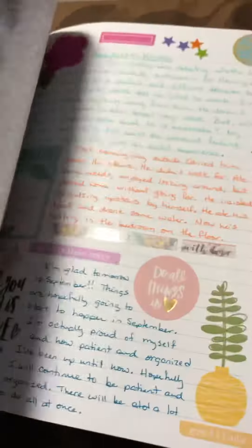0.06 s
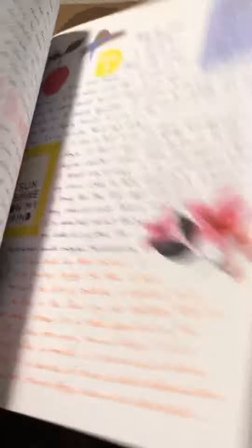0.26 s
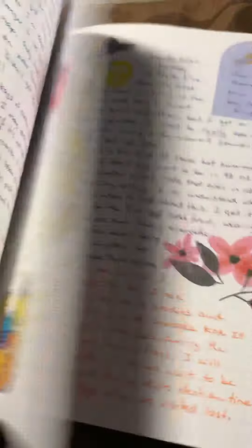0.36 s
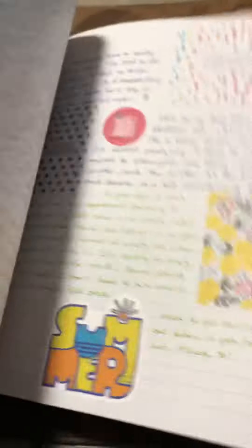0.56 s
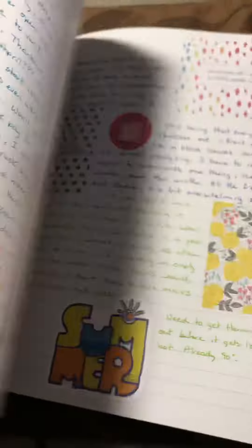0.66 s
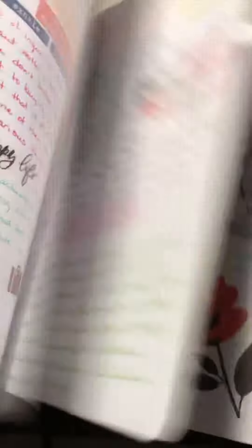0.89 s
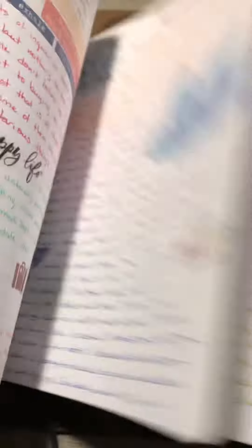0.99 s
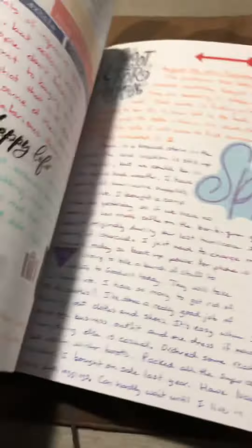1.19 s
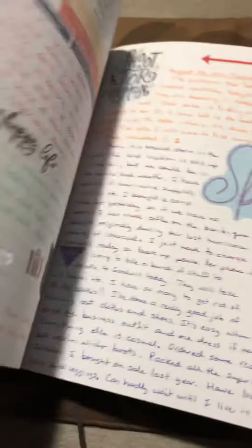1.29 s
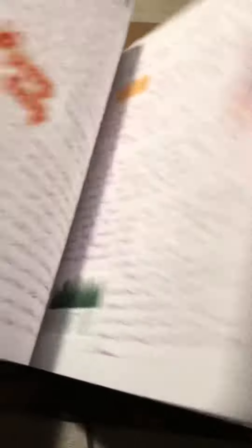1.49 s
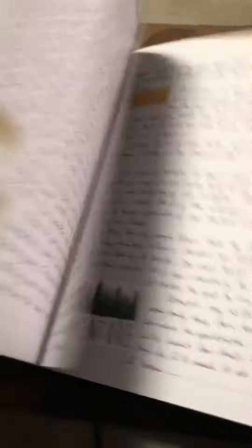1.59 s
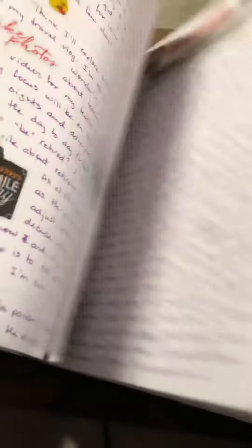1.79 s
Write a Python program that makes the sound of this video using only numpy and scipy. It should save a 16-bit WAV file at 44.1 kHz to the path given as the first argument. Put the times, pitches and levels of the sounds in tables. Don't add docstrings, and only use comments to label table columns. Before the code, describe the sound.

Thick paper pages slip off a thumb with sharp dry flicks, faint rustles and soft air puffs

```python
import sys
import numpy as np
from scipy import signal
from scipy.fft import rfft, irfft, next_fast_len
from scipy.io import wavfile
from scipy.ndimage import uniform_filter1d, map_coordinates

SR = 44100
rng = np.random.default_rng(int(sys.argv[2]) if len(sys.argv) > 2 else 0)


def invert_db(level):
    return 10 ** (np.asarray(level, dtype=float) / 20)


def generate_wav(signal):
    frames = np.transpose(np.atleast_2d(signal))
    scaled = np.clip(frames, -1, 1) * 32767
    pcm = np.round(scaled).astype(np.int16)
    wavfile.write(sys.argv[1], SR, pcm)


N = 81585


def unit(x):
    return x / np.sqrt(np.mean(x ** 2) + 1e-20)


def along(points, hz):
    f, v = np.transpose(points)
    return np.interp(np.log(hz + 1), np.log(f + 1), v)


def filtered(x, response, size):
    return irfft(rfft(x, size) * response(np.fft.rfftfreq(size, 1 / SR) + 1e-3), size)


def wobble(rate, count):
    knots = rng.standard_normal(int(count / SR * 8000) + 4)
    return map_coordinates(knots, [np.arange(count) * rate / SR])


def add(out, s, piece):
    out[round(s * SR):][:len(piece)] += piece


def lateness(f, delay_ms):
    spread = 0.7
    return np.exp(-2j * np.pi * delay_ms * (f / 1000) ** (1 - spread) / (1 - spread))


# (frequency [Hz], density [dB per Hz])
AIR_SPECTRUM = [(26, -29), (48, 3.5), (236, 0), (480, -9.5), (1470, -18.5), (4350, -23.5), (15900, -30),
                (16500, -71)]
# (frequency [Hz], level [dB], width [Hz])
HUM_LINES = [
    (61, -70, 15),
    (503.8, -77.5, 9.9),
    (552, -81, 7.2),
]
AIR_DB, AIR_WOBBLE_DB, PATCHY_DB = -62.5, 0.4, 1.5


def air():
    z = signal.stft(rng.standard_normal(N + 512), nperseg=512)[2]
    field = uniform_filter1d(rng.standard_normal(z.shape), size=12, axis=0)
    field = uniform_filter1d(field, size=8, axis=1)
    patchy = signal.istft(z * invert_db(PATCHY_DB * unit(field)), nperseg=512)[1][:N]
    size = next_fast_len(N + 8192)
    noise = filtered(patchy, lambda f: invert_db(along(AIR_SPECTRUM, f)), size=size)[:N]
    hum = np.zeros(N)
    for hz, db, width in HUM_LINES:
        line = filtered(rng.standard_normal(N), lambda f: 1 / (1 + (2 * (f - hz) / width) ** 2), size=size)
        hum += invert_db(db) * unit(line[:N])
    return invert_db(AIR_DB + AIR_WOBBLE_DB * wobble(6.04, count=N)) * unit(noise) + hum


def strokes(table, q, rough_db, rate):
    out, t = np.zeros(N + SR), np.arange(4096) / SR
    fade = 0.26
    for s, length, db, hz in table:
        def resonance(f):
            damping = 1j * f * hz / q
            return (damping / (hz * hz - f * f + damping)) ** 2 / (1 + (f / hz / 2) ** 4)

        noise = rng.standard_normal(4096) * invert_db(rough_db * wobble(rate, count=4096))
        tone = filtered(noise, resonance, size=4096)
        rise = np.clip(t / (fade * length / 2), 0, 1)
        fall = np.exp(-np.maximum(t - (1 - fade) * length, 0) / (fade * length))
        shape = rise * fall
        add(out, s, invert_db(db) * tone * shape * np.linalg.norm(shape) / np.linalg.norm(tone * shape))
    return out[:N]


# (start [s], length [s], level [dB], pitch [Hz])
RUB_EVENTS = [(.12, 0.048, -75, 4930), (.22, 0.05, -69, 3800), (.313, 0.033, -58.5, 2550),
              (.315, 0.024, -64.5, 4500), (.317, 0.033, -65, 10800), (.36, 0.12, -74, 3000),
              (.742, 0.045, -65, 6100), (.8, 0.006, -69, 9000), (.812, 0.074, -70, 8000),
              (.846, 0.036, -70.5, 6000), (.891, 0.027, -65.5, 3000), (1.09, 0.038, -75, 2750),
              (1.215, 0.05, -75, 2860), (1.423, 0.007, -64.5, 3000), (1.595, 0.02, -64.5, 2240)]


def rubs():
    return strokes(RUB_EVENTS, q=1.8, rough_db=4, rate=593)


# (frequency [Hz], gain [dB])
EDGE_SPECTRUM = [(300, -19), (800, -1), (1500, -4.5), (3000, -3.5), (8000, -7), (16000, -6)]
RISE_MS, FALL_MS = 0.13, 0.23
GRIT_DB = 3.5
SNAP_DELAY_MS = 1.564
RATTLE_DB, RATTLE_MS, RATTLE_ROUGH_DB = -24.5, 7.1, 4


def edge_bursts(events, bump_db):
    out, ms = np.zeros(N + SR), np.arange(2048) / SR * 1000 - 1
    for s, hold_ms, db, hz in events:
        def colour(f):
            bump = bump_db * np.exp(-np.log2(f / hz) ** 2)
            return invert_db(along(EDGE_SPECTRUM, f) + bump) * lateness(f, SNAP_DELAY_MS)

        noise = rng.standard_normal(2048)
        late = np.maximum(ms - hold_ms, 0)
        rise = np.exp(np.minimum(ms, 0) / RISE_MS)
        burst = noise * invert_db(GRIT_DB * wobble(2323, count=2048)) * rise * np.exp(-late / FALL_MS)
        roughness = invert_db(RATTLE_DB + RATTLE_ROUGH_DB * wobble(720, count=2048))
        rattle = roughness * noise * rise * np.exp(-late / RATTLE_MS)
        even = uniform_filter1d(np.abs(rfft(burst, 4096)), size=250)
        burst = filtered(burst, lambda f: colour(f) / np.sqrt(even), size=4096)
        rattle = filtered(rattle, colour, size=4096)
        rattle /= np.sqrt(np.mean(np.abs(colour(np.linspace(1, SR / 2, num=200))) ** 2))
        size = np.sqrt((hold_ms + FALL_MS / 2) * SR / 1000)
        start = s - (1 + SNAP_DELAY_MS / 4) / 1000
        add(out, start, invert_db(db) * (burst * size / np.linalg.norm(burst) + rattle))
    return out[:N]


# (time [s], level [dB], colour [Hz])
TICK_EVENTS = [(0.1409, -59.0, 6500.0), (0.1648, -58.0, 3200.0), (0.1893, -61.0, 6400.0),
               (0.2017, -50.0, 6700.0), (0.4295, -50.0, 7000.0), (0.4384, -54.0, 5000.0),
               (0.4393, -51.0, 7500.0), (0.4408, -58.0, 6000.0), (0.6243, -61.0, 5700.0),
               (0.6305, -59.0, 4600.0), (0.6331, -53.0, 6200.0), (0.6472, -53.0, 5200.0),
               (0.7149, -53.0, 7600.0), (0.7454, -49.0, 8000.0), (0.7474, -53.0, 8200.0),
               (0.7747, -51.0, 7500.0), (0.7892, -53.0, 6300.0), (1.1351, -63.0, 6500.0),
               (1.1417, -62.0, 5900.0), (1.1926, -61.0, 8100.0), (1.201, -49.0, 3200.0),
               (1.2063, -50.0, 3700.0), (1.2933, -61.0, 6000.0), (1.3747, -61.0, 5200.0),
               (1.4242, -54.0, 3400.0), (1.4395, -60.0, 3100.0), (1.4632, -61.0, 3800.0),
               (1.4698, -53.0, 3000.0), (1.5214, -61.0, 4300.0), (1.5684, -56.0, 6700.0),
               (1.5727, -52.0, 4300.0), (1.7475, -54.0, 4400.0), (0.319, -55.0, 8500.0),
               (0.3232, -59.0, 9000.0), (0.3282, -57.0, 9000.0), (0.8013, -57.0, 11000.0),
               (0.8041, -57.0, 10000.0)]
TICK_DB = 1.5


def ticks():
    events = [(s, 0.3, db + TICK_DB, hz) for s, db, hz in TICK_EVENTS]
    return edge_bursts(events, bump_db=16)


# (start [s], length [s], level [dB], pitch [Hz])
PUFF_EVENTS = [(.142, 0.0086, -64, 1140), (.232, 0.025, -58, 710), (.24, 0.041, -58, 238),
               (.458, 0.045, -59.5, 154), (.642, 0.0072, -46.5, 198), (.764, 0.017, -52.5, 132),
               (.848, 0.0074, -47, 720), (.858, 0.028, -52.5, 497), (.85, 0.042, -55.5, 223),
               (1.505, 0.024, -57.5, 155), (1.03, 0.04, -60, 332), (1.03, 0.031, -58, 710),
               (1.505, 0.016, -58.5, 533), (1.651, 0.011, -54, 422), (1.662, 0.028, -57, 633),
               (1.745, 0.027, -64, 520)]


def puffs():
    return strokes(PUFF_EVENTS, q=1.3, rough_db=1, rate=143)


# (time [s], hold [ms], level [dB], colour [Hz])
SNAP_EVENTS = [(0.2042, 0.16, -28, 5700), (0.2063, 1.9, -35.5, 6530), (0.207, 0.12, -26, 5270),
               (0.3434, 0.1, -39.5, 9500), (0.4452, 1.2, -40.5, 6160), (0.447, 0.5, -45, 8000),
               (0.4481, 0.1, -32, 9500), (0.6353, 0.45, -39, 12000), (0.6356, 0.1, -34, 5500),
               (0.637, 1, -52, 5000), (0.7514, 3.4, -47, 8000), (0.7546, 0.15, -24.5, 8900),
               (0.7599, 0.3, -39.5, 9200.0), (0.7769, 3.6, -48, 6200.0), (0.8094, 0.39, -26, 8500),
               (0.8195, 0.37, -44, 9100.0), (0.8233, 0.1, -17, 12100), (0.824, 0.5, -32, 9500),
               (0.826, 2, -47, 7440), (0.828, 0.23, -40, 7000), (0.8437, 0.14, -26, 8000),
               (0.8438, 1.4, -39.5, 6500), (1.16, 0.25, -42, 5000), (1.1642, 0.46, -39.5, 12900),
               (1.2099, 1.5, -38.5, 6500), (1.289, 0.38, -37, 6640), (1.3812, 0.3, -41.5, 5950),
               (1.3839, 3.43, -43.5, 7950), (1.4747, 2.7, -45, 7000), (1.478, 3.2, -51.5, 3000),
               (1.4892, 0.38, -44.5, 5630), (1.5811, 0.63, -36, 7800), (1.5826, 0.21, -33, 8500),
               (1.582, 1.4, -40, 4930), (1.5839, 2.6, -44.5, 5470), (1.7963, 0.6, -45.5, 8800)]


def snaps():
    return edge_bursts(SNAP_EVENTS, bump_db=8.5)


# (time [s], pitch [Hz],
# level [dB], length [ms])
RING_EVENTS = [(.2041, 6340, -28.5, 2.8), (.2043, 8100, -35, 1.5), (.207, 8530, -21, 1.37),
               (.2062, 4900, -30, 2.4), (.2066, 6440, -22.5, 1.4), (.2072, 2730, -33, 1.9),
               (.2078, 1700, -37, 4.2), (0.344, 1500, -50.5, 7.2), (.4476, 3370, -34, 3.4),
               (.4477, 5000, -33, 2.2), (.4474, 9650, -33.5, 2), (.636, 1020, -44, 3.4),
               (.6354, 3420, -44, 3), (.6356, 5300, -35, 1.5), (.6348, 11000, -42, 0.86),
               (.6352, 16000, -38, 1.7), (.7544, 7850, -26, 1.3), (.7545, 4460, -33, 2.2),
               (.8118, 4300, -50, 3), (.8118, 8700, -49, 3), (.8231, 11700, -16.5, 0.8),
               (.8231, 7500, -25, 1.04), (.8232, 1250, -35.5, 3.4), (.849, 830, -45, 6.3),
               (.861, 950, -52.5, 15), (1.036, 720, -54.5, 30), (0.755, 2640, -33, 2.2),
               (1.2096, 2940, -34, 4.9), (1.2099, 1575, -40, 6.9), (1.386, 1486, -38.5, 2.7),
               (1.475, 3200, -38.5, 4.9), (1.475, 6500, -44.5, 4.8), (1.4752, 7380, -45, 3.6),
               (1.4752, 10000, -43.5, 3.5), (1.489, 2700, -50.5, 4.4), (1.5812, 3650, -41, 3.5),
               (1.513, 730, -52.5, 6.9), (1.4746, 2190, -43, 3.9), (1.5824, 2610, -38.5, 4.8),
               (1.583, 1695, -37.5, 3.5), (1.5803, 3020, -38.5, 3), (1.5803, 8530, -38.5, 4),
               (1.5803, 9200, -39.5, 3.3), (1.5803, 10500, -36, 4.1), (1.5805, 6200, -44, 5.4),
               (1.664, 580, -49, 28), (1.653, 1000, -57, 16), (1.2097, 3420, -36.5, 4.2),
               (1.2105, 7350, -38, 2.5), (1.1636, 14700, -40, 1.8), (1.1641, 3380, -44, 2.4),
               (.346, 890, -51, 5.4)]
SAG_HZ = 90
RING_ROUGH = 0.6


def rings():
    out, ms = np.zeros(N + SR), np.arange(2048) / SR * 1000
    for s, hz, db, length_ms in RING_EVENTS:
        u = np.minimum(ms / length_ms, 1)
        pitch = hz + min(SAG_HZ, hz / 20) * (1 - u)
        phase = 2 * np.pi * pitch * ms / 1000 + RING_ROUGH * wobble(hz / 6, count=2048)
        add(out, s, invert_db(db) * np.sin(np.pi * np.sqrt(u)) * np.sin(phase))
    return out[:N]


# (time [s], level [dB], delay at 1 kHz [ms], tilt [dB per octave])
WAVE_EVENTS = [(0.2073, -40.5, 2.5, -4.5), (0.3436, -48.5, 3, 2.5), (.4485, -47, 2.5, -2),
               (.636, -48, 2.5, -2), (0.757, -35.5, 2.543, 5.5), (0.8091, -47.5, 1.2, 1.5),
               (0.8236, -35, 1.392, 3.5), (0.8436, -44.5, 1.2, 0), (1.1636, -50, 2.5, 0.5),
               (1.2105, -47, 2.5, 0.5), (1.2891, -39.5, 1.04, 7), (1.3853, -42, 2.5, 3),
               (1.4765, -46, 2.5, 1), (1.489, -52, 1.5, 3.5), (1.5843, -57, 2.5, -5)]
WAVE_LOW_HZ, WAVE_HIGH_HZ = 83.7, 3000
SMEAR_MS, PUSH_SCATTER = 0.9, 0.3


def waves():
    out, ms = np.zeros(N + SR), np.arange(256) / SR * 1000
    for s, db, delay_ms, tilt_db in WAVE_EVENTS:
        def sheet(f):
            band = 1 / (1 + (WAVE_LOW_HZ / f) ** 4) / (1 + (f / WAVE_HIGH_HZ) ** 4)
            return invert_db(tilt_db * np.log2(f / 1000)) * band * lateness(f, delay_ms)

        push = 1 + PUSH_SCATTER * rng.standard_normal(256)
        push *= np.exp(-ms / SMEAR_MS) * np.where(ms > 0, 0.3, 1)
        wave = filtered(push, sheet, size=8192)
        add(out, s - delay_ms / 2500, invert_db(db) * wave[:4096] / np.abs(wave).max())
    return out[:N]


# (frequency [Hz], 60 dB decay time [s])
ROOM_DECAY = [(300, 0.25), (3000, .14), (12000, 0.032)]
ROOM_DB, ROOM_DULL_HZ = -20.5, 8000


def room(x):
    hz, t, z = signal.stft(rng.standard_normal(SR // 3), SR, nperseg=256)
    dull = 1 / (1 + (hz / ROOM_DULL_HZ) ** 2)
    decay = invert_db(-60 * t / along(ROOM_DECAY, hz)[:, None])
    tail = signal.istft(z * dull[:, None] * decay, SR, nperseg=256)[1]
    echo = signal.fftconvolve(np.pad(x, (200, 0)), tail / np.linalg.norm(tail))[:N]
    return invert_db(ROOM_DB) * echo


def scene():
    rustle = puffs() + rubs()
    pages = rustle + snaps() + ticks() + waves()
    return (pages + rings() + room(pages) + air())[None]


def low_pass(x):
    return signal.sosfilt(signal.butter(12, 16990, fs=SR, output="sos"), x)


def record(dry):
    top_hz = 16060
    mix = filtered(dry, lambda f: 1 / (1 + (f / top_hz) ** 80), size=next_fast_len(N + 8192))[:, :N]
    return low_pass(mix)


dry = scene()
out = record(dry)
generate_wav(out)
```